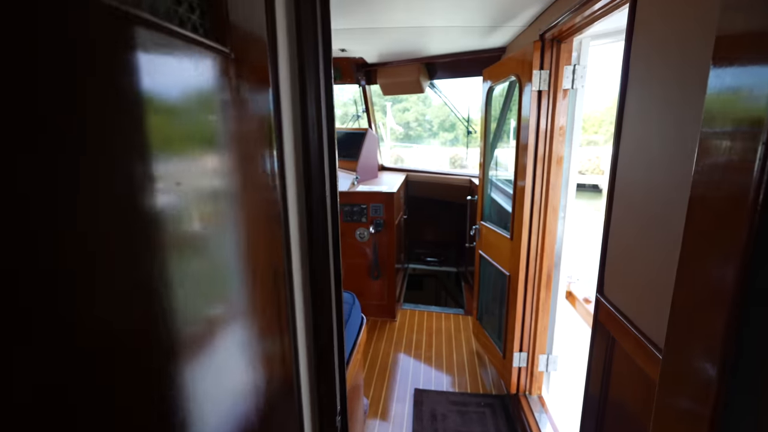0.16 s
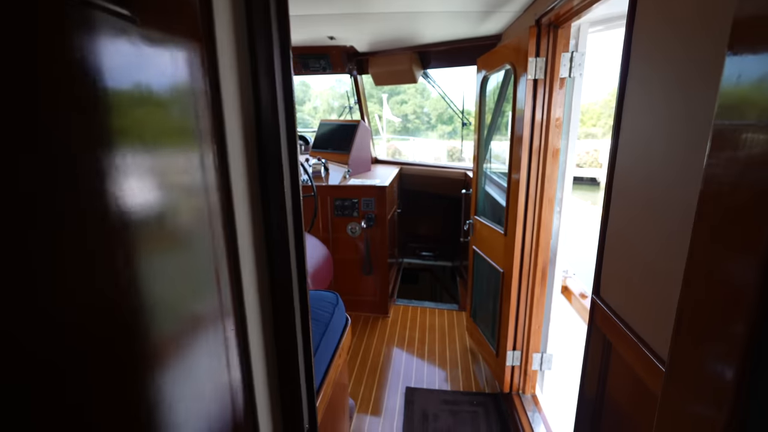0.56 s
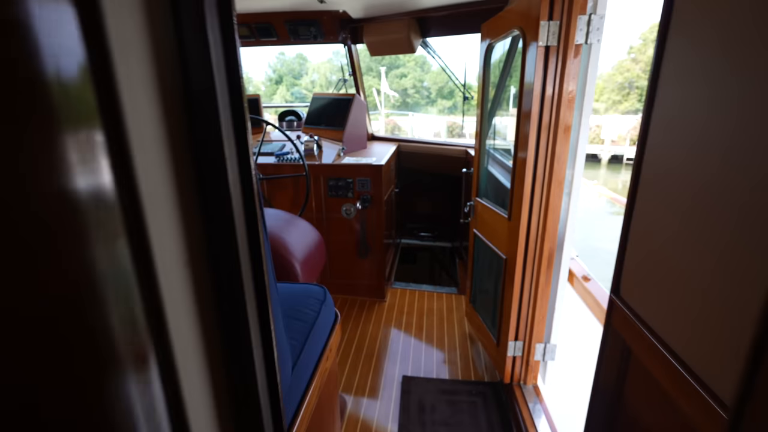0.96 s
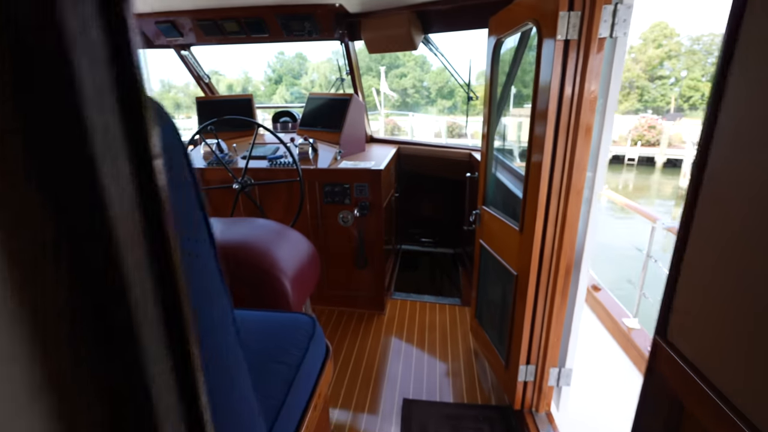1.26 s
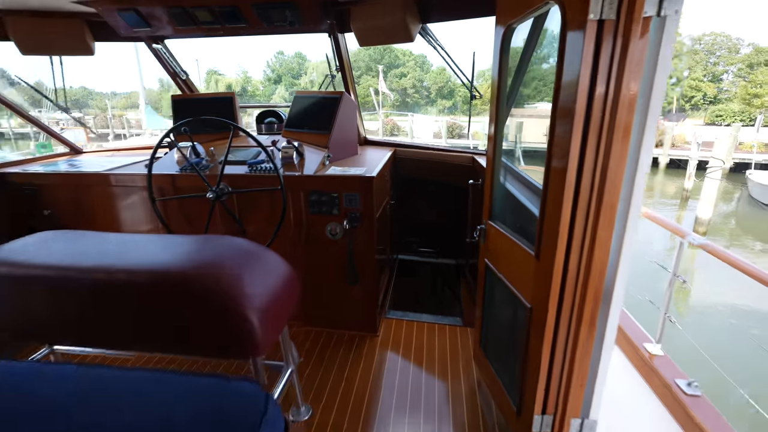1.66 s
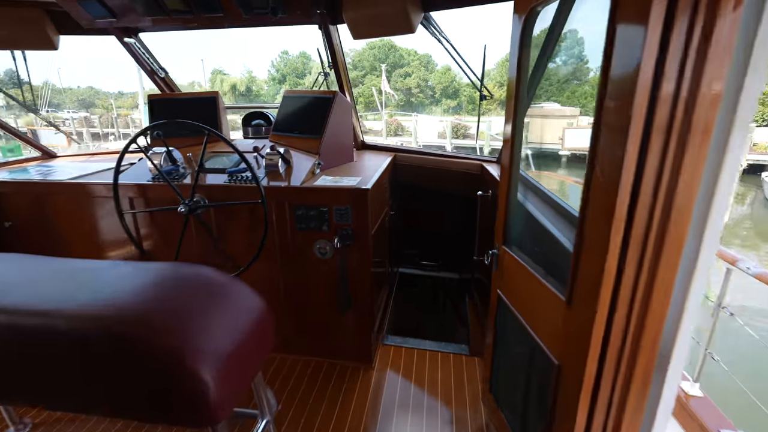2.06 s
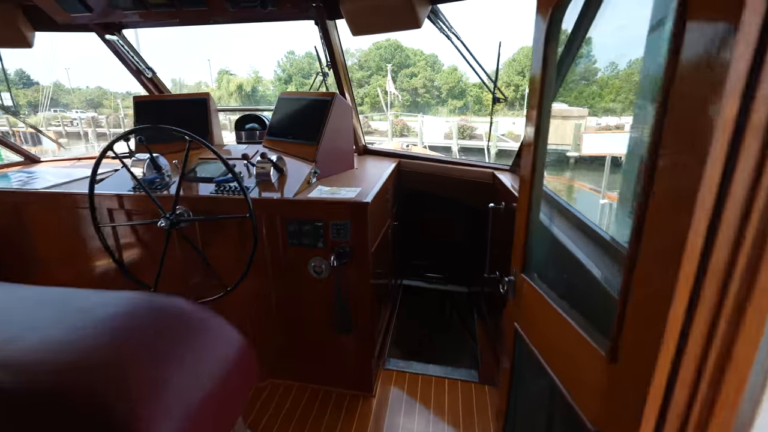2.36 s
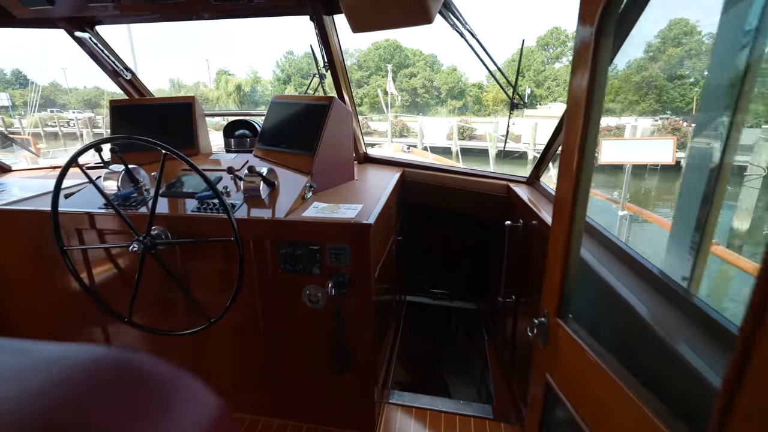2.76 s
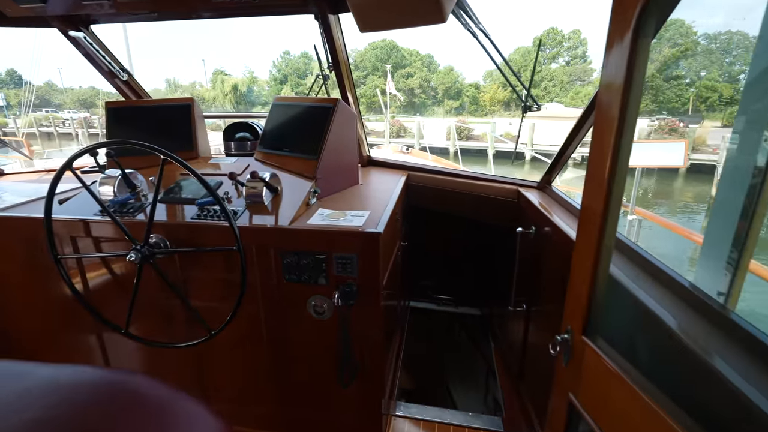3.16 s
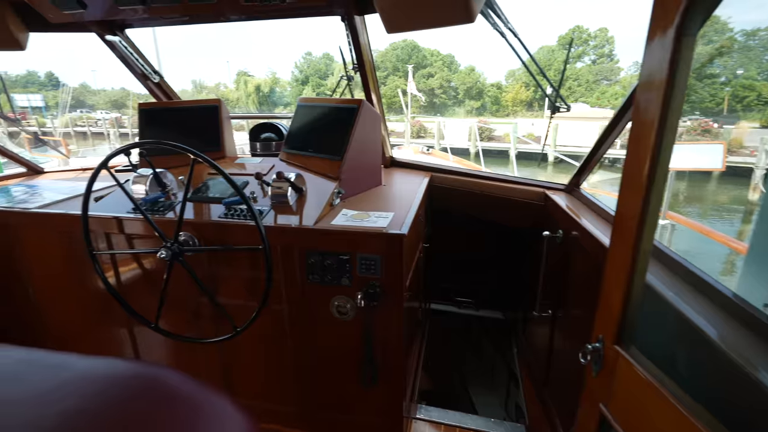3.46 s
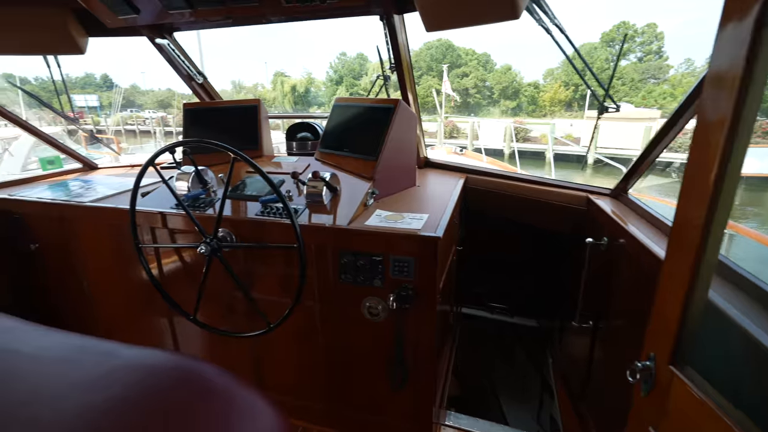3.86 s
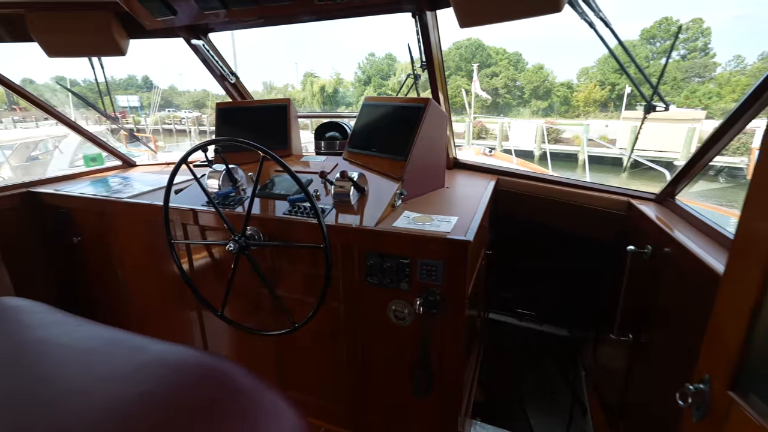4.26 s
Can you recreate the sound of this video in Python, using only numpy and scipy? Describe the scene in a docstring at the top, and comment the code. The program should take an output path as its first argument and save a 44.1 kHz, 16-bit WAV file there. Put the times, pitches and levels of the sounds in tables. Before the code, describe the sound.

Slow steps on a creaking, crackling wooden boat floor over a low wavering hum, ending in heavy booming knocks with clatter.

```python
"""Wooden cabin of a moored boat: a wavering machine hum, moving air and low hull rumble run throughout.
Someone walks slowly forward; ticks sound near the microphone, and shifting weight makes boards crackle and slip.
Soft hisses, steps, hollow pops and brushes of cloth follow; last, three heavy knocks with rebounds boom and clatter.
Hum and modes are sines; air, rumble and cloth are shaped noise; contacts are noise bursts with a cabin tail."""
import sys
import numpy as np
from scipy import signal
from scipy.fft import rfft, irfft
from scipy.io import wavfile
from scipy.ndimage import uniform_filter1d

SR = 44100
rng = np.random.default_rng(int(sys.argv[2]) if len(sys.argv) > 2 else 0)


def persist_wave(psi):
    """Save psi, clipped to +-1, as 16-bit WAV."""
    counts = np.round(np.clip(psi, -1, 1) * 32767).astype(np.int16)
    wavfile.write(sys.argv[1], SR, np.atleast_2d(counts).T)


N = 193943

# machine hum lines: centre_hz, relative_db, wander_width_hz
HUM_LINES = [(59.9, -51, 1.5), (120.57, -45.5, 0.21), (174.5, -65, 7.5), (276.3, -75.5, 18.9),
             (453.7, -68, 8.9), (906, -70, 23.3), (1033, -74.5, 52)]
# gains along the walk, by nearness to the machine: time_s, hum_db, air_db
NEARNESS = [(0, -5.5, -56), (.8, -6, -56.5), (1.4, -10, -54.5), (1.7, -2, -54), (2.3, -0.5, -50.5),
            (3.0, 2, -51), (3.6, 0.5, -51.5), (4.4, 5, -52.5)]
# moving air, relative density: frequency_hz, density_db
AIR_SPECTRUM = [(60, 2.5), (140, 7), (200, -8), (260, -3.5), (400, -8.5), (700, -11.5), (950, -8.5),
                (1200, -14.5), (1600, -17.5), (2300, -29.5), (4000, -39.5), (6500, -37), (7800, -33.5),
                (9200, -38.5), (14000, -42.5), (15500, -90)]
# hull and microphone rumble, relative density: frequency_hz, density_db
RUMBLE_SPECTRUM = [(8, -17), (20, 7.5), (35, 10.5), (55, 12.5), (80, -5), (110, 4.5), (150, -14),
                   (220, -16.5), (400, -52.5)]
# lurches of hull and carried microphone under the steps: centre_s, level_db
HULL_LURCHES = [(.33, -51), (.97, -42.5), (1.66, -39.5), (2.411, -33.5), (2.585, -31.5), (3.03, -42.5)]
# clothing, relative density: frequency_hz, density_db
CLOTH_SPECTRUM = [(300, -40), (1500, 12), (3200, 5), (5000, -4), (9500, 0.5), (16000, -10.5)]
# brushes of clothing: centre_s, level_db, half_length_s
CLOTH_BRUSHES = [(2.36, -66, 0.033), (2.464, -60, 0.02), (2.54, -73, 0.43), (3.17, -69, 0.025),
                 (3.684, -74, 0.09)]
# shifts of weight that make the boards crackle: peak_strain_s, crackle_db, build_up_s
WEIGHT_SHIFTS = [(0.62, -58.5, 0.046), (0.984, -51, 0.16), (1.244, -56.5, 0.012), (1.63, -71, .03),
                 (1.905, -75, 0.018), (2.075, -56, 0.049), (2.285, -76, 0.078), (2.87, -51, 0.022),
                 (3.145, -63, 0.0087)]
# colour of the crackle: frequency_hz, relative_db
CRACKLE_COLOUR = [(100, -10), (280, -11.5), (450, 2), (750, 3.5), (1300, -5), (2200, -14), (4000, -44),
                  (16000, -36)]
# narrow resonances of boards and fittings: centre_hz, width_hz, lift_db
RESONANCES = [(232, 100, 9), (390, 21, 10), (553, 90, 4), (794, 28, 3), (903, 35, 0), (1690, 9.1, 5),
              (2140, 44, 6), (2360, 93, 3), (2620, 300, 2), (6750, 69, 3.5), (8750, 260, 0.5),
              (9300, 19, 5)]
# cabin tail by band: centre_hz, t60_s
CABIN_DECAY = [(100, 1), (400, 0.46), (1500, 0.21), (5000, 0.22), (9000, 0.21), (16000, 0.12)]
# small dry contacts: start_s, level_db, centre_hz, width_octaves, fall_s
SMALL_TICKS = [(0.002, -43, 10500, 0.25, 0.0034), (0.139, -63.5, 7240, 0.4, 0.0024),
               (0.806, -58.5, 7700, 0.2, 0.0021), (2.356, -67, 9400, 0.33, 0.014),
               (2.363, -51, 8850, 0.34, 0.0038), (2.437, -45, 10800, 1.1, 0.007),
               (2.691, -44, 10100, 0.34, 0.0019), (3.145, -57, 9100, 1, 0.009),
               (3.6305, -43.5, 13200, 0.41, 0.00027), (3.6328, -44.5, 9600, 0.33, 0.00074),
               (3.745, -45, 1430, 0.37, 0.0031)]
# floorboard slips: start_s, level_db, joint_hz; then relative: joint_db, body_db, crack_db, edge_db
BOARD_SLIPS = [(0.433, -47, 1650, -14, -1, -1, -48), (0.585, -50.5, 1850, -14, -3, -1, -20),
               (0.85, -46.5, 1090, -8, -13, 0, -17.5), (0.874, -45, 1427, -5, -12, -7, -19),
               (0.903, -46, 790, 0, -10, -11, -25), (0.926, -44.5, 696, 1, -4, -3, -13.5),
               (0.938, -49, 803, 8.5, -6, -6, -22), (0.970, -36.5, 975, -14, -9, -7, -17.5),
               (0.989, -45, 1890, -7, -2, -7, -24), (1.023, -40, 1496, -7.5, -9, -0.5, -13),
               (1.029, -53, 1960, -11, -10, -3, -18), (1.047, -55, 616, 8.5, 6.5, -16, -34),
               (1.222, -44.5, 2615, -3.5, -9, -1, -18.5), (1.222, -57, 4470, 2.5, -3, 0, -20),
               (1.243, -49, 644, 1, 5, -18, -32), (1.273, -55.5, 760, 5, 5, -20, -30),
               (1.616, -41, 1350, -18, -27, -25, -50), (1.899, -41.5, 1760, -7.5, 1, -4, -18.5),
               (2.026, -47.5, 996, 5, -5, -19, -24), (2.035, -48, 2150, 0, 3, -19, -27),
               (2.048, -58, 797, 13, 9, -14, -30), (2.079, -40, 973, -4.5, -7, -3, -33),
               (2.093, -50.5, 1385, 3, 4, -14, -17), (2.109, -46, 900, 0, -6, -11, -32),
               (2.121, -57, 500, 2, 9, -13, -30), (2.435, -48.5, 2110, 0, -19, -5, -25),
               (2.689, -46.5, 1480, -12, 1.5, -4, -13), (2.786, -45, 1600, -20, -17, -2, -17),
               (2.83, -41.5, 1380, -9, -20, -6, -18.5), (2.847, -39, 1310, -3, -7, -5, -15),
               (2.86, -39, 1930, -1, -11, -1, -14), (2.866, -42.5, 815, 1.5, -5.5, 0, -23),
               (2.872, -50, 2080, -2, -11, 4, -20), (2.904, -47.5, 2100, 1, -16, -8, -23),
               (2.912, -45.5, 1155, 0.5, -8, -8, -29), (2.956, -49.5, 3050, -13, -3, -6, -23),
               (3.143, -40, 2596, -7, -11, 3.5, -10.5)]
# colour of the slips: frequency_hz, relative_db
SLIP_TONE = [(60, -31), (180, 14.5), (400, 9), (900, 9), (1800, 1), (3200, -4), (5000, 0.5), (8000, 8.5),
             (12000, -3), (16000, -39)]
# soft hisses and rubs: centre_s, level_db, half_length_s, centre_hz, width_octaves
SOFT_HISSES = [(0.618, -66.5, 0.029, 1890, 0.27), (1.505, -71.5, 0.15, 1750, 0.04),
               (2.194, -71, 0.14, 406, 0.25), (3.408, -73, 0.033, 2300, 0.085),
               (3.592, -72.5, 0.095, 2140, 0.38), (3.765, -72.5, 0.043, 3250, 0.15)]
# soft footfalls: start_s, level_db, board_hz
FOOTFALLS = [(1.628, -48.5, 295), (1.901, -50.5, 330), (2.038, -49.5, 424), (2.085, -47, 333),
             (2.869, -46.5, 208), (3.147, -47, 200), (3.17, -46.5, 233)]
# hollow pops of a loaded board: start_s, level_db, pitch_hz, snap_db
BOARD_POPS = [(2.159, -42, 450, -74), (2.2045, -37, 367, -61), (2.246, -37, 413, -58),
              (2.286, -31.5, 385, -55.5)]
# knocks and rebounds: start_s, boom_db, wood_db, clatter_db, rise_s, spot_hz, spot_lift_db
PANEL_KNOCKS = [(4.046, -11.5, -33.5, -31, 0.0078, 370, 13), (4.066, -19.5, -57, -43.5, 0.0047, 350, -2),
                (4.082, -27.5, -35, -37.5, 0.0031, 200, 6), (4.092, -29, -56, -54, 0.003, 310, 16),
                (4.165, -36, -45.5, -73, 0.0028, 1650, 6), (4.228, -17.5, -36, -36, 0.0078, 220, 6),
                (4.245, -20, -27.5, -48.5, 0.0037, 229, 9), (4.267, -22.5, -49, -50, 0.0015, 870, 3),
                (4.288, -23, -55, -52, 0.0029, 410, 7), (4.309, -38, -47, -48.5, 0.001, 390, -20),
                (4.359, -11.5, -20, -45, 0.0016, 850, 2), (4.374, -50, -27, -43.5, 0.0067, 484, -2)]
# floor panel modes: frequency_hz, relative_db, t60_s
PANEL_MODES = [(22.4, -3.5, 0.6), (80.2, 2, 0.16), (112, -27, 0.35), (156, -17, 0.53), (206, -21.5, 0.58),
               (261, -27, 0.46), (382.6, -18, 0.2), (590, -33, 0.15), (740, -27, 0.13), (903, -22, 0.24)]
# modes of wall panelling: frequency_hz, relative_db, t60_s
WALL_MODES = [(316, -17.5, 0.52), (359, -22.5, 0.71), (489, -22, 0.33), (644, -19, 0.38), (867, -14, 0.19),
              (1078, -18, 0.15), (1614, -21, 0.2)]
# modes of metal fittings: frequency_hz, relative_db, t60_s
FITTING_MODES = [(1265, -16, 0.13), (2230, -15, 0.075), (2420, -11, 0.038), (3730, -7, 0.049),
                 (4420, -17, 0.06), (6595, -30, 0.13), (8300, -16, 0.12), (9080, -17, 0.23),
                 (9700, -24, 0.12)]
# colour of a wooden knock: frequency_hz, relative_db
KNOCK_COLOUR = [(50, -15), (150, 5), (250, 4), (320, 2.5), (450, -0.5), (720, 3.5), (1200, -5.5),
                (2200, -11), (3500, -17.5), (6000, -26), (16000, -39)]
# colour of clatter and dry snaps: frequency_hz, relative_db
CLATTER_TONE = [(200, -27), (1000, 9.5), (2300, 5.5), (4000, 1.5), (5500, -1.5), (7500, 0), (9000, 1),
                (11000, -5), (13000, -9), (16000, -16)]

SWAY_DB, SWAY_DB_PER_S = -43, -1  # eases as the walker slows
LURCH_HALF_S = 0.072
SHUDDER_DB, SHUDDER_FALL_S = -13.5, 0.11  # level relative to the boom
RUSTLE_DB, RUSTLE_DB_PER_S = -72.5, -0.5  # eases as the walker slows
REST_CRACKLE_DB, RELAX_S = -73.5, 0.046
TICK_ROOM_DB, TICK_ROOM_DB_PER_DOUBLING = -23.5, 2  # cabin tail at 1 ms fall; longer ticks stir it more
EDGE_HZ = 16000
BURST_SAMPLES = 16384
TIME_S = np.arange(N) / SR
AGE_S = np.arange(BURST_SAMPLES) / SR
HZ = np.fft.rfftfreq(BURST_SAMPLES, 1 / SR)
NOISE_HZ = np.fft.rfftfreq(N, 1 / SR)


def amp(db):
    """Decibels to gain."""
    return 10 ** (np.asarray(db) / 20)


def unit(x):
    """Scales to rms 1."""
    return x / np.sqrt(np.mean(np.abs(x) ** 2) + 1e-20)


def read(points, hz):
    """Reads a spectrum on a log-frequency axis."""
    point_hz, value = np.transpose(points)
    return np.interp(np.log(hz + 1), np.log(point_hz + 1), value)


def level(rows, axis=1):
    """One dB column of a curve as a gain for every sample."""
    columns = np.transpose(rows)
    return amp(np.interp(TIME_S, columns[0], columns[axis]))


def add(mix, start_s, sound):
    """Mixes a sound in at start_s."""
    part = mix[max(round(start_s * SR), 0):][:len(sound)]
    part += sound[:len(part)]


def noise(points):
    """Steady noise of a given spectrum, rms 1."""
    white = rfft(rng.standard_normal(N))
    return unit(irfft(white * amp(read(points, NOISE_HZ)), N))


def drift(rate_hz):
    """Slow random wandering, rms 1."""
    white = rfft(rng.standard_normal(N))
    lowpass = np.exp(-(NOISE_HZ / rate_hz) ** 2) * (NOISE_HZ > 0)
    return unit(irfft(white * lowpass, N))


def swell(centre_s, half_s):
    """A smooth bump around centre_s."""
    return np.exp(-((TIME_S - centre_s) / half_s) ** 2)


def surge(peak_s, build_s, fall_s):
    """Builds up to 1 at peak_s, then dies away."""
    return np.exp(-np.maximum((peak_s - TIME_S) / build_s, (TIME_S - peak_s) / fall_s))


def together(gains):
    """Level of several unrelated sounds: their powers add."""
    return np.sqrt(sum(gain ** 2 for gain in gains))


def dying(t60_s):
    """An envelope that falls 60 dB in t60_s."""
    return np.exp(-np.log(1000) * AGE_S / t60_s)


def bell(hz, octaves):
    """Spectrum of one broad resonance, rms 1."""
    return unit(np.exp(-np.log2((HZ + 1) / hz) ** 2 / (2 * octaves ** 2)))


def wood_rings():
    """Gain of the narrow resonances of boards and fittings."""
    return amp(sum(db / (1 + (2 * (HZ - hz) / width_hz) ** 2) for hz, width_hz, db in RESONANCES))


def cabin_tail(gain):
    """Diffuse sound in the cabin, each band dying at its own speed."""
    diffuse = rfft(rng.standard_normal(BURST_SAMPLES)) * gain
    log_centres = np.log([hz for hz, _ in CABIN_DECAY])
    tail = np.zeros(BURST_SAMPLES)
    for row, (_, t60_s) in zip(np.eye(len(CABIN_DECAY)), CABIN_DECAY):
        share = np.interp(np.log(HZ + 1), log_centres, row)
        tail += irfft(diffuse * share) * dying(t60_s)
    return tail


def burst(gain, rise_s, fall_s, room_db, grain_db=2.0, hold_s=0):
    """A ragged contact swells, may hold, and dies quickly; the cabin tail follows."""
    contact, grain = rng.standard_normal((2, BURST_SAMPLES))
    contact = unit(contact * amp(grain_db * unit(uniform_filter1d(grain, size=30))))
    rise_s, fall_s = max(rise_s, 1e-4), max(fall_s, 1e-4)
    fade = np.exp(-np.maximum(AGE_S - rise_s - hold_s, 0) / fall_s)
    blow = np.minimum(AGE_S / rise_s, 1) * fade
    room = amp(room_db) * cabin_tail(gain) * (1 - np.exp(-AGE_S / (rise_s + fall_s)))
    return irfft(rfft(contact) * gain) * blow + room


def machine(waver=0.11):
    """Wavering hum lines, low and higher, over moving air, levels following nearness."""
    hum = np.zeros(N)
    for hz, db, width_hz in HUM_LINES:
        line_hz = hz + width_hz / 2 * drift(width_hz + 1)
        hum += amp(db) * np.sqrt(2) * np.sin(2 * np.pi * np.cumsum(line_hz) / SR)
    hum *= 1 + waver * drift(12.5)
    return level(NEARNESS) * hum + level(NEARNESS, axis=2) * noise(AIR_SPECTRUM)


def sway(build_s=0.0013):
    """Rumble level: a steady sway, lurches under the steps, a shudder after each knock."""
    steady = amp(SWAY_DB + SWAY_DB_PER_S * TIME_S)
    lurches = [amp(db) * swell(s, LURCH_HALF_S) for s, db in HULL_LURCHES]
    shudders = [amp(boom_db + SHUDDER_DB) * surge(s, build_s, SHUDDER_FALL_S)
                for s, boom_db, *_ in PANEL_KNOCKS]
    return together([steady] + lurches + shudders)


def brushing():
    """Level of the brushes of clothing."""
    return together([amp(db) * swell(s, half_s) for s, db, half_s in CLOTH_BRUSHES])


def rustle():
    """Level of the clothes: a steady rustle and a few brushes."""
    return together([amp(RUSTLE_DB + RUSTLE_DB_PER_S * TIME_S), brushing()])


def walker(grain_db=1.5):
    """Steps rock the hull and microphone as low noise; cloth rubs as noise in small grains."""
    rumble = sway() * noise(RUMBLE_SPECTRUM)
    cloth = rustle() * noise(CLOTH_SPECTRUM) * amp(grain_db * drift(150))
    return rumble + cloth


def strain():
    """Crackle level: builds as weight comes onto the boards and relaxes afterwards."""
    loads = [amp(db) * surge(s, build_s, RELAX_S) for s, db, build_s in WEIGHT_SHIFTS]
    return together([amp(REST_CRACKLE_DB)] + loads)


def boards(slips_per_s=110, spread_db=8.0, fall_s=0.0024, room_db=-6, variants=5):
    """Strained boards crackle with many tiny random slips."""
    wood = unit(wood_rings() * amp(read(CRACKLE_COLOUR, HZ)))
    out = np.zeros(N)
    for _ in range(variants):
        size = amp(spread_db * np.minimum(rng.exponential(1, N), 3))
        slips = size * (rng.random(N) < slips_per_s / variants / SR)
        out += signal.oaconvolve(slips, burst(wood, 0.001, fall_s, room_db))[:N]
    return strain() * unit(out)


def ticks(rise_s=0.000093):
    """Small hard contacts, each with one broad resonance."""
    out = np.zeros(N)
    for s, db, hz, octaves, fall_s in SMALL_TICKS:
        room_db = TICK_ROOM_DB + TICK_ROOM_DB_PER_DOUBLING * np.log2(fall_s * 1000)
        add(out, s, amp(db) * burst(bell(hz, octaves), rise_s, fall_s, room_db))
    return out


def joint(hz, spread=0.1545, side_db=-7):
    """A joint's note with a weaker mode on either side of it."""
    below, above, turn = rng.random(3)
    side_hz = [hz * np.exp(-spread * (.5 + below)), hz * np.exp(spread * (.5 + above))]
    sides = sum(np.sin(2 * np.pi * (f * AGE_S + turn)) for f in side_hz)
    return np.sin(2 * np.pi * hz * AGE_S) + amp(side_db) * sides


def creaks(rise_s=0.0016, hold_s=0.0058, fall_s=0.0036, room_db=-9.5, joint_t60_s=0.046, wood_db=-5.5,
           grain_db=4.0):
    """Each slip rasps a board for milliseconds with its own body, crack and edge; its joint rings."""
    out = np.zeros(N)
    wood = wood_rings() * amp(read(SLIP_TONE, HZ) + wood_db)
    ring = dying(joint_t60_s) * (1 - np.exp(-AGE_S / rise_s))
    for s, db, hz, joint_db, body_db, crack_db, edge_db in BOARD_SLIPS:
        tone_db = read([(400, body_db), (900, 0), (2200, 0.012), (3800, crack_db), (7500, edge_db)], HZ)
        add(out, s, burst(wood * amp(db + tone_db), rise_s, fall_s, room_db, grain_db, hold_s))
        add(out, s, amp(db + joint_db) * ring * joint(hz))
    return out


def hisses():
    """Each is a faint swell of band noise, some narrow enough to sound pitched."""
    out = np.zeros(N)
    for s, db, half_s, hz, octaves in SOFT_HISSES:
        kernel = np.fft.fftshift(irfft(bell(hz, octaves)))
        hiss = signal.oaconvolve(rng.standard_normal(N), kernel, "same")
        out += amp(db) * swell(s, half_s) * unit(hiss)
    return out


def steps(rise_s=0.0025, fall_s=0.024, octaves=0.22, room_db=-8):
    """A soft sole lands with a dull, hollow push."""
    out = np.zeros(N)
    for s, db, hz in FOOTFALLS:
        add(out, s, amp(db) * burst(bell(hz, octaves), rise_s, fall_s, room_db))
    return out


def pops(rise_s=0.003, fall_s=0.0014, body_db=-14, body_octaves=0.74, body_fall_s=0.0054,
         snap_fall_s=0.0074, room_db=-9):
    """A loaded board gives way in a few swings, with a hollow after-sound and a dry snap."""
    out = np.zeros(N)
    swing = np.minimum(AGE_S / rise_s, 1) * np.exp(-np.maximum(AGE_S - rise_s, 0) / fall_s)
    snap = unit(amp(read(CLATTER_TONE, HZ)))
    for s, db, hz, snap_db in BOARD_POPS:
        body = amp(body_db) * burst(bell(hz, body_octaves), rise_s, body_fall_s, room_db)
        add(out, s, amp(db) * (swing * np.sin(2 * np.pi * hz * AGE_S) + body))
        add(out, s, amp(snap_db) * burst(snap, rise_s, snap_fall_s, room_db))
    return out


def crinkles(snaps_per_s=130, spread_db=5, relative_db=-3, hz=9000, octaves=0.87, fall_s=0.0005, room_db=-22):
    """Folds of cloth snap in tiny separate clicks during each brush."""
    size = amp(spread_db * np.minimum(rng.exponential(1, N), 3))
    snaps = size * (rng.random(N) < snaps_per_s / SR)
    clicks = signal.oaconvolve(snaps, burst(bell(hz, octaves), 0, fall_s, room_db))[:N]
    return amp(relative_db) * brushing() * unit(clicks)


def ringing(modes, rise_s, detune=0.0181):
    """Shaken parts ring on in their own modes, a little differently after each blow."""
    ring = np.zeros(BURST_SAMPLES)
    for hz, db, t60_s in modes:
        mode_hz = hz * (1 + detune * rng.standard_normal())
        ring += amp(db) * dying(t60_s) * np.sin(2 * np.pi * (mode_hz * AGE_S + rng.random()))
    return ring * np.minimum(AGE_S / max(rise_s, 1e-4), 1)


def knocks(wood_fall_s=0.016, wood_room_db=-16, clatter_fall_s=0.0076, clatter_room_db=-9, push_share=0.84,
           spot_octaves=0.73):
    """Fittings clatter as the panel is loaded; it bottoms out, knocks and booms, and the walls ring."""
    out = np.zeros(N)
    boom = sum(amp(db) * dying(t60_s) * np.sin(2 * np.pi * hz * AGE_S) for hz, db, t60_s in PANEL_MODES)
    wood = unit(wood_rings() * amp(read(KNOCK_COLOUR, HZ)))
    clatter = unit(wood_rings() * amp(read(CLATTER_TONE, HZ)))
    for s, boom_db, wood_db, clatter_db, rise_s, spot_hz, spot_db in PANEL_KNOCKS:
        rattle = burst(clatter, rise_s, clatter_fall_s, clatter_room_db) + ringing(FITTING_MODES, rise_s)
        add(out, s, amp(clatter_db) * rattle)
        spot = bell(spot_hz, spot_octaves)
        struck = unit(wood * amp(spot_db * spot / spot.max()))
        knock = burst(struck, rise_s, wood_fall_s, wood_room_db, grain_db=1.5)
        add(out, s + rise_s / 2, amp(wood_db) * (knock + ringing(WALL_MODES, rise_s)))
        # a slower push leaves the higher panel modes at rest
        push = np.hanning(max(round(push_share * rise_s * SR), 3))
        pushed = signal.oaconvolve(boom, push / push.sum())
        add(out, s + rise_s - len(push) / SR / 2, amp(boom_db) * pushed)
    return out


def scene():
    """Everything heard in the cabin."""
    background = machine() + walker() + boards()
    contacts = ticks() + creaks() + hisses() + steps() + pops() + crinkles() + knocks()
    return (background + contacts)[None]


def record(dry):
    """The microphone sheds the deepest bass; then the recorder's band limit."""
    sound = signal.sosfilt(signal.butter(1, 6, "highpass", fs=SR, output="sos"), dry)
    lowpass = signal.firwin(511, EDGE_HZ, window=("kaiser", 9), fs=SR)
    return signal.oaconvolve(sound, lowpass[None], "same")


dry = scene()
out = record(dry)
persist_wave(out)
```